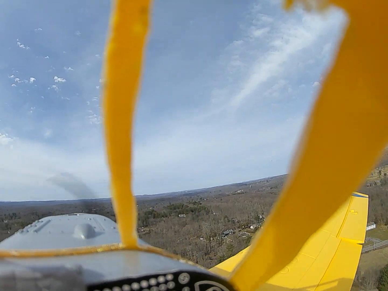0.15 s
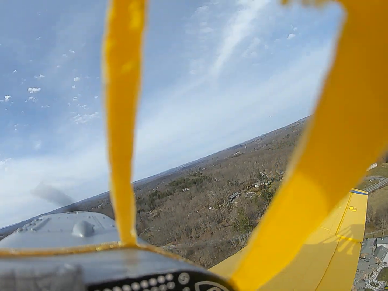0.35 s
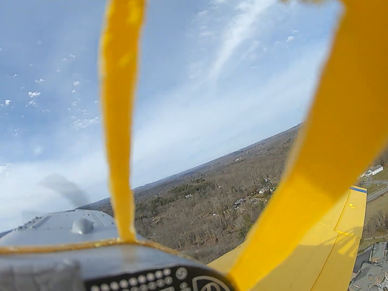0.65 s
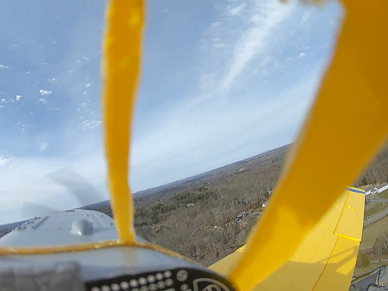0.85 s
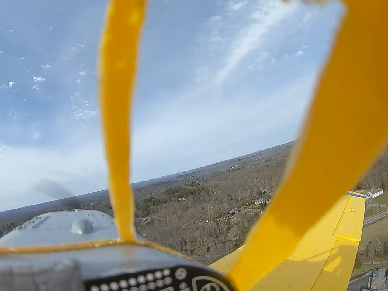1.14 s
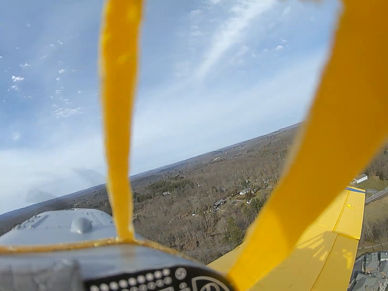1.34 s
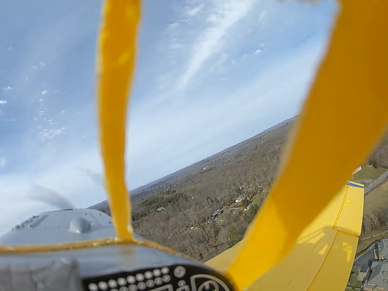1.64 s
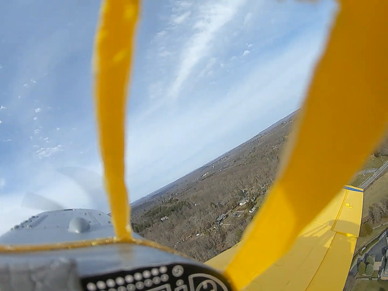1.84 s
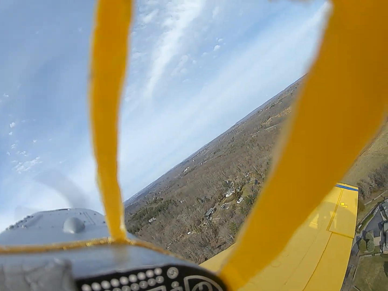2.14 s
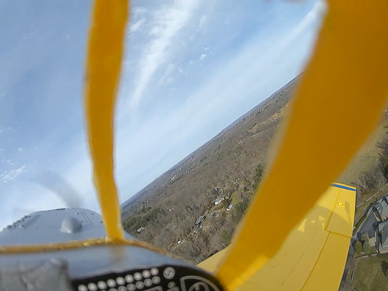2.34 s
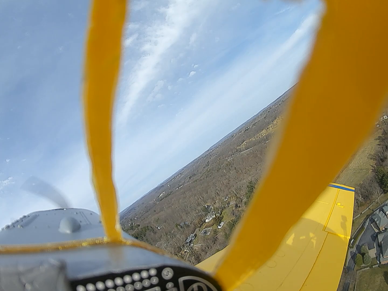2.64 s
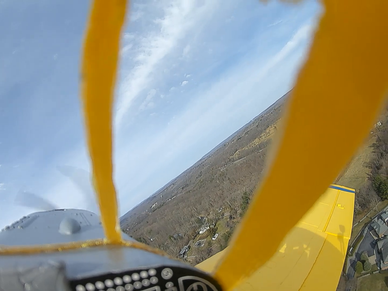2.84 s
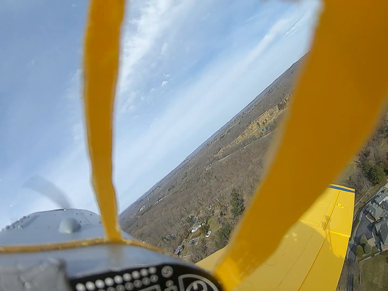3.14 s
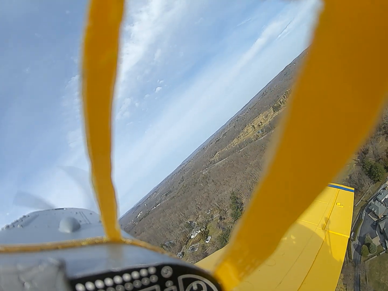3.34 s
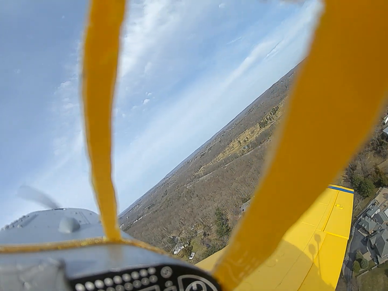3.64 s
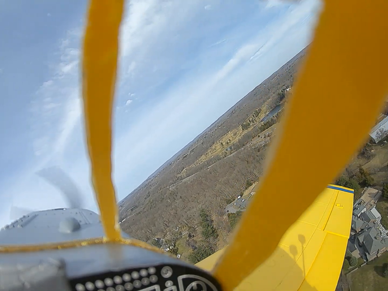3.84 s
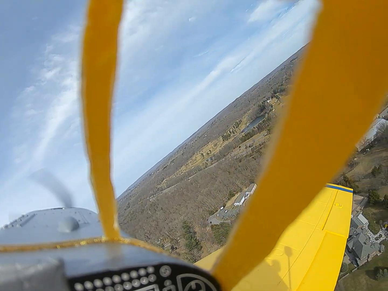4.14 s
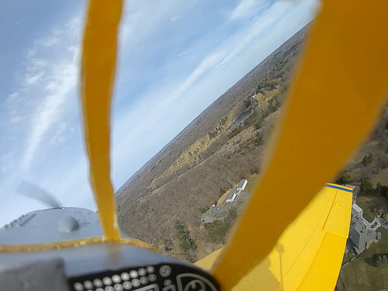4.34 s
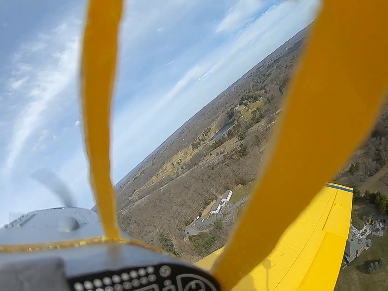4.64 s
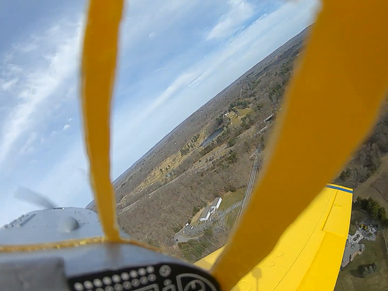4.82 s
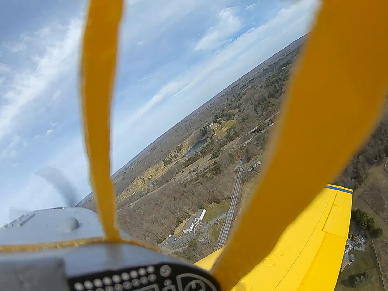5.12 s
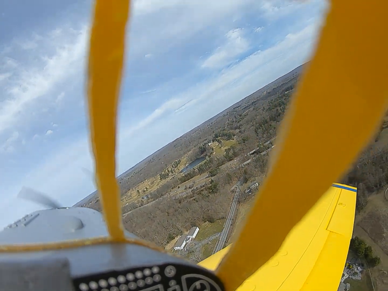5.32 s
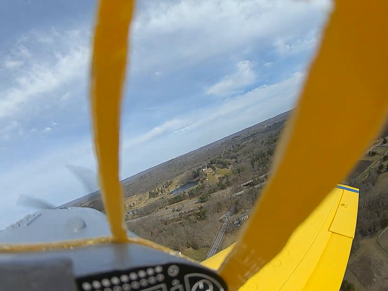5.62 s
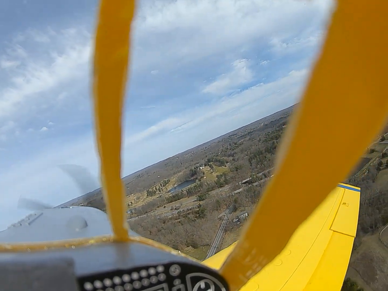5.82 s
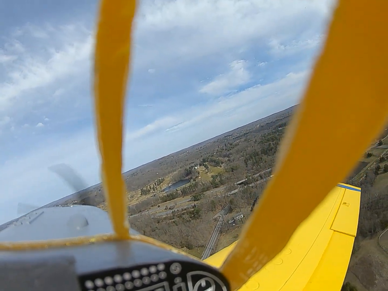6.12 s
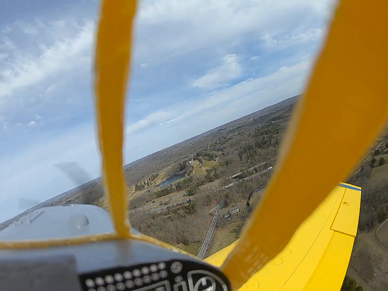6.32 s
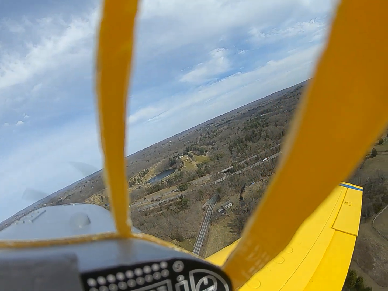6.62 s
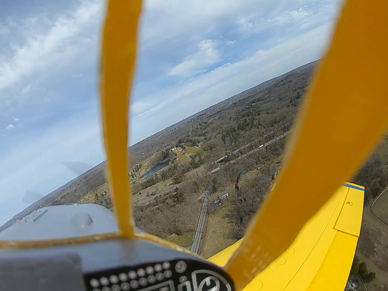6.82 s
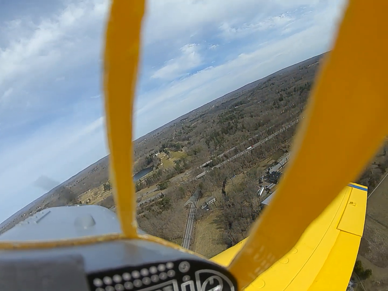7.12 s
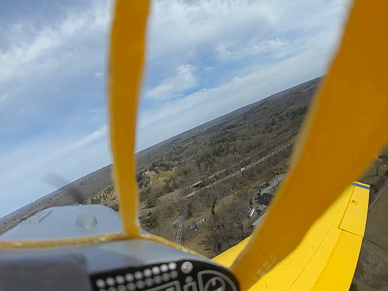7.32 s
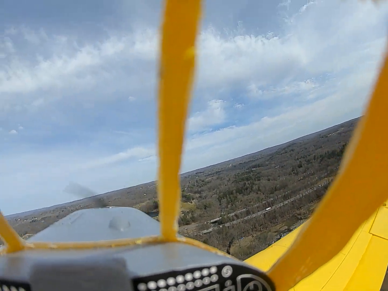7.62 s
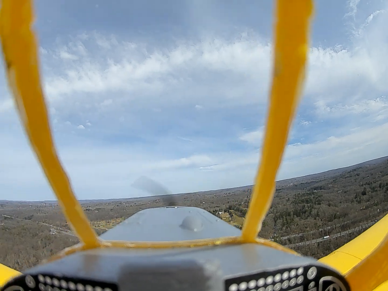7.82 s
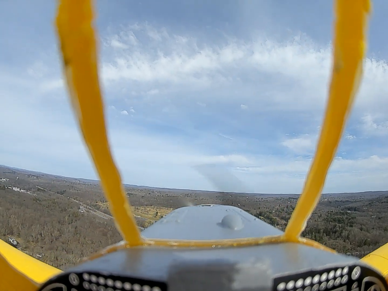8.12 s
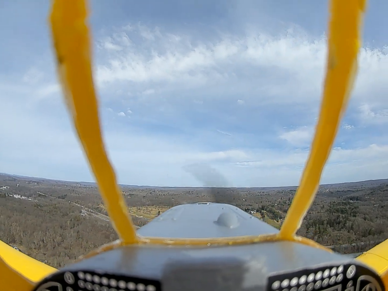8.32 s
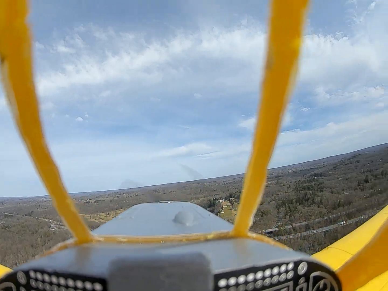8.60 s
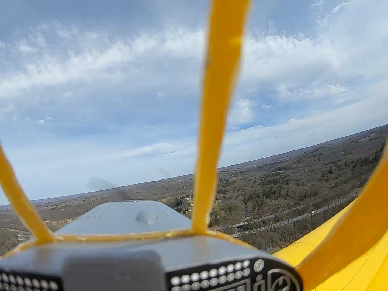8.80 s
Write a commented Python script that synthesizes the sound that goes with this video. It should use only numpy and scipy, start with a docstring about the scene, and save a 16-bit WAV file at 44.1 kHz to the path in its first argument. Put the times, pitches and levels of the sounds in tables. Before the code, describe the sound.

Close inside the cockpit of a flying electric model plane, a propeller hum shakes the airframe and makes a loose part buzz. Partway through, the motor slows to a lower, much softer hum with a thin whine and no rattle. Near the end it speeds up quickly, bringing the buzz back and holding a steady pitch. Rushing air and low wind buffeting continue throughout.

```python
"""The propeller hum of a small electric model plane in flight, from a microphone inside the cockpit.
The unbalanced propeller shakes the airframe at the shaft rate; the throttle eases back, then opens again.
At high speed a loose part strikes twice a turn and buzzes; at low speed it rests and the motor's
magnetic whine comes through. Air rushes over the canopy, close around the microphone, throughout."""
import sys
import numpy as np
from scipy import signal
from scipy.fft import rfft, irfft, next_fast_len
from scipy.io import wavfile
from scipy.ndimage import uniform_filter1d, map_coordinates

SR = 44100
rng = np.random.default_rng(int(sys.argv[2]) if len(sys.argv) > 2 else 0)


def generate_wav(signal):
    """Clip the signal to [-1, 1] and save it as 16-bit WAV at the path in sys.argv[1]."""
    frames = np.transpose(np.atleast_2d(signal))
    scaled = np.clip(frames, -1, 1) * 32767
    pcm = np.round(scaled).astype(np.int16)
    wavfile.write(sys.argv[1], SR, pcm)


N = 395130
CRUISE_HZ, CRUISE_SHAKE_DB = 165, -21.5

# The throttle through the flight. Each row: time in seconds, shaft speed in Hz.
THROTTLE = [(0.4, 182.3), (2.0, 180.5), (2.4, 174.6), (2.95, 170.7), (3.36, 157.2), (3.65, 147.7),
            (4.02, 140.1), (4.49, 139.0), (4.83, 137.0), (5.83, 137.5), (6.36, 141.4), (6.64, 143.3),
            (6.81, 155.3), (7.15, 165.2), (7.34, 167.0), (7.95, 165.0), (8.96, 164.8)]
# How hard the imbalance shakes the cockpit. Each row: shaft speed in Hz, level in dB.
IMBALANCE = [(137, -39.5), (144, -35.5), (154, -28), (161, -22), (175.5, -21), (179.5, -25.5), (182, -25.5)]
def propeller():
    """Speed, turns made and shaking; turbulence loads the blades unevenly, more so at speed."""
    speed = timeline(THROTTLE)
    drift = 0.0009 * (speed / CRUISE_HZ) ** 5 * wobble(9)
    flutter = 0.0005 * wobble(50)
    turns = np.cumsum(speed * (1 + drift + flutter)) / SR
    return speed, turns, along(IMBALANCE, speed)


# The motor's effort. Each row: shaft acceleration in Hz per second, gain in dB.
EFFORT = [(-38, -3.5), (-0.5, 0), (-1, 0), (7, 2)]
def motor_load(speed):
    """Gain in dB: the motor pulls harder while it speeds up and coasts while it slows."""
    acceleration = uniform_filter1d(np.gradient(speed) * SR, size=SR // 5)
    return np.interp(acceleration, *np.transpose(EFFORT))


# Airframe panels around the microphone. Each row: resonance in Hz, width in Hz, peak gain in dB.
PANEL_MODES = [(364.4, 10.5, -36.5), (390, 11, -57), (497, 20, -42.5), (537, 12, -54.5), (672, 32, -49)]
def panels(hz):
    """Gain of the panels, which resonate as a tone sweeps through them."""
    powers = (amp(db) ** 2 / (1 + (2 * (hz - centre) / width) ** 2) for centre, width, db in PANEL_MODES)
    return np.sqrt(sum(powers))


# One overtone swells. Each row: shaft order, middle in seconds, length in seconds, boost in dB.
HUM_SWELLS = [(3, 5.13, 1.9, 11), (2, 8.44, 1.7, 6)]
# The hum's weak top. Each row: shaft order, level in dB against the slipstream level.
UPPER_ORDERS = [(5, -17), (6, -18.5), (7, -20), (8, -22), (9, -20.5), (10, -23.5), (13, -28)]
def hum(turns, speed, shake_db, load_db, rush_db):
    """Imbalance and blade passes shake the airframe; gusts make the tones waver."""
    out = (amp(shake_db) + amp(-55.5) * wobble(24)) * tone(turns, 1)
    for order in (2, 3, 4):
        swell_db = sum(db * bump(s, length) for which, s, length, db in HUM_SWELLS if which == order)
        drive = (speed / CRUISE_HZ) ** 2 * amp(load_db + swell_db + 1.28 * wobble(15))
        out += drive * panels(order * speed) * tone(turns, order)
    for order, db in UPPER_ORDERS:
        out += amp(rush_db + load_db + db + 2.3 * wobble(8)) * tone(turns + rng.random(), order)
    return out


# The buzz falters. Each row: middle in seconds, length in seconds, depth in dB.
FLOATS = [(.27, .025, 6), (0.308, 0.045, 5), (0.437, .03, 7), (0.489, 0.12, 6.5), (.845, 0.025, 5),
          (0.964, 0.048, 12), (1.203, 0.91, 3), (1.23, 0.042, 14), (1.29, 0.062, 22), (1.507, .06, 5),
          (3.417, .2, 1.5), (8.4, 2.3, 1.5)]
def strike_force(shake_db, lift_off_db=-29.5):
    """The loose part rests until shaken hard enough; gusts press it harder or let it float."""
    excess = np.sqrt(np.maximum(amp(shake_db) ** 2 - amp(lift_off_db) ** 2, 0))
    dip_db = sum(depth_db * bump(s, length) for s, length, depth_db in FLOATS)
    gust_db = 0.47 * wobble(65) + 0.2 * wobble(7)
    return excess ** 0.76 * amp(gust_db - dip_db)


# The loose part's ring, heard close. Each row: frequency in Hz, relative level in dB.
PART_RING = [(1200, -27), (2350, -8), (2650, -2.5), (2950, -8.5), (3300, 2), (3600, -2.5), (3900, 4),
             (4200, -2.5), (4500, 0), (5200, -2), (6200, 9), (6900, -0.5), (7900, -4.5), (8700, -10.5),
             (10000, -9.5), (13300, -21.5)]
# The scrape of its return strike. Each row: frequency in Hz, relative level in dB.
PART_SCRAPE = [(2000, -9), (3500, 1.5), (4600, -2.5), (5900, -2), (7200, -3), (8600, -7.5), (10000, -3),
               (11000, -5.5), (11900, -9.5), (13000, -5), (13900, -8), (14800, -3), (15600, -5),
               (16000, -11.5)]
def rattle(turns, speed, shake_db):
    """A loose part ticks on its stop once a turn, chafes, then scrapes the opposite stop."""
    force = strike_force(shake_db)
    swing = turns + 0.0052 * wobble(25)  # the moment of contact wanders
    blows = strikes(swing, angle=0.5, jitter_s=1.6e-5, scatter_db=0.6)
    scuffs = scuff(blows, life_s=0.0015)
    tick = ring(blows, PART_RING)
    chafe = amp(-1.5) * ring(scuffs, PART_RING) + amp(-7) * ring(scuffs, PART_SCRAPE)
    chafe_db = -17 + 0.7 * (speed - CRUISE_HZ)
    rebounds = strikes(swing, angle=0.16, jitter_s=0.00014, scatter_db=-1.0)
    scrape = ring(scuff(rebounds, life_s=0.0006), PART_SCRAPE) + amp(-10) * noise(PART_SCRAPE)
    scrape_db = -7 + 2.3 * (shake_db - CRUISE_SHAKE_DB)
    return amp(-28) * force * (tick + amp(chafe_db) * chafe + amp(scrape_db) * scrape)


def strikes(turns, angle, jitter_s, scatter_db, size=8):
    """One impulse each time the shaft passes an angle (in turns), uneven in time and strength."""
    passes = np.arange(1, int(turns[-1]) - 1) + angle
    late, strong = rng.standard_normal((len(passes), 2)).T
    at = np.interp(passes, turns, np.arange(N)) + jitter_s * SR * late
    taps = at.astype(int)[:, None] + np.arange(1 - size, size + 1)
    offset = taps - at[:, None]
    shape = np.sinc(offset) * np.cos(np.pi * offset / (2 * size)) ** 2  # lands between samples
    pulses = shape * amp(scatter_db * strong)[:, None]
    return np.bincount(np.clip(taps, 0, N - 1).ravel(), pulses.ravel(), N)


def scuff(blows, life_s):
    """Each blow drags on as a short burst of noise."""
    return signal.lfilter([1], [1, -np.exp(-1 / (life_s * SR))], blows) * rng.standard_normal(N)


def ring(x, spectrum, size=1024):
    """x through a body that rings only after it is struck (minimum phase), at rms 1."""
    cepstrum = irfft(np.log(amp(along(spectrum, np.fft.rfftfreq(size, 1 / SR)))))
    cepstrum[1:size // 2] *= 2
    cepstrum[size // 2 + 1:] = 0
    response = irfft(np.exp(rfft(cepstrum)))
    return unit(signal.oaconvolve(x, response)[:N])


def slipstream(speed, cruise_db=-42, db_per_octave=20.5, lag_s=0.21):
    """Slipstream level in dB: airspeed takes a moment to follow the propeller."""
    target_db = cruise_db + db_per_octave * np.log2(speed / CRUISE_HZ)
    keep = np.exp(-1 / (lag_s * SR))
    return target_db[0] + signal.lfilter([1 - keep], [1, -keep], target_db - target_db[0])


# Turbulence along the way. Each row: time in seconds, relative level of the buffeting in dB.
ROUGH_AIR = [(0, -48), (1.6, -48), (2.05, -44.5), (4.5, -49), (6.4, -51.5), (7.3, -50), (8.96, -54)]
# Three colours of wind, heard from under the canopy. Each row: frequency in Hz, relative level in dB.
FUSELAGE_BUFFET = [(20, -29), (35, -15), (65, 0), (120, 2), (200, -1), (300, -8), (470, -6), (650, -17.5),
                   (1200, -32), (3000, -68)]
CANOPY_RUSH = [(100, 3.5), (230, 5), (450, 1.5), (650, -2.5), (950, -2), (1150, 0.5), (1400, 2.5),
               (1700, -2.5), (2100, -9.5), (2600, -19), (3000, -21), (6000, -40.5)]
GAP_HISS = [(1500, -16), (3000, -7), (3900, 5), (4200, 3), (5200, 3), (6200, 4.5), (7300, -3), (7900, -1),
            (8600, -9), (9600, -4.5), (11000, -21), (12500, -21), (13400, -13), (15500, -24)]
def airflow(rush_db):
    """Eddies thump the fuselage while the slipstream rushes over the canopy and hisses in its gaps."""
    buffet = amp(timeline(ROUGH_AIR) + 6.0 + 0.55 * wobble(13)) * noise(FUSELAGE_BUFFET)
    rush = amp(rush_db + 2.0 + 0.52 * wobble(24)) * noise(CANOPY_RUSH)
    hiss = amp(rush_db - 22.3) * noise(GAP_HISS)
    return buffet + rush + hiss


# The motor bell's resonance, where the main whine swells. Each row: frequency in Hz, level in dB.
MOTOR_BELL = [(5500, -60), (5760, -58.5), (5860, -62.5), (6000, -65.5), (6300, -68), (7000, -98)]
# Orders in sevens from 14 magnets, and sidebands. Each row: shaft order, level in dB before motor load.
MAGNET_ORDERS = [(21, -84.5), (28, -81), (35, -78.5), (36, -83), (41, -79.5), (43, -76.5), (44, -76.5),
                 (46, -85), (57, -90)]
def whine(turns, load_db, main_order=42, switching_hz=11698):
    """Magnets sweep past the stator teeth; the speed controller adds a faint, steady switching tone."""
    main_hz = main_order * np.gradient(turns) * SR
    main = amp(along(MOTOR_BELL, main_hz) + 0.48 * wobble(8.7)) * tone(turns, main_order)
    magnets = sum(amp(db + load_db + 2 * wobble(15)) * tone(turns + rng.random(), order)
                  for order, db in MAGNET_ORDERS)
    switching = amp(-87) * tone(np.arange(N) / SR, switching_hz)
    return main + magnets + switching


def amp(db):
    """Decibels to gain."""
    return 10 ** (np.asarray(db) / 20)


def unit(x):
    """x at rms 1."""
    return x / np.sqrt(np.mean(x ** 2) + 1e-20)


def along(points, hz):
    """(Hz, value) points read on a log axis."""
    freqs, values = np.transpose(points)
    return np.interp(np.log(hz + 1), np.log(freqs + 1), values)


def timeline(points):
    """(seconds, value) points read at every sample."""
    return np.interp(np.arange(N) / SR, *np.transpose(points))


def bump(middle_s, length_s):
    """A smooth rise from 0 to 1 and back."""
    return np.cos(np.pi * np.clip((np.arange(N) / SR - middle_s) / length_s, -0.5, 0.5)) ** 2


def wobble(rate):
    """A smooth random curve of rms 1, rate knots a second."""
    knots = rng.standard_normal(int(N * rate / SR) + 4)
    return unit(map_coordinates(knots, [np.arange(N) * rate / SR]))


def tone(turns, order):
    """A sine of rms 1, order cycles to the turn."""
    return np.sqrt(2) * np.sin(2 * np.pi * order * turns)


def filtered(x, response):
    """x shaped by a gain that depends on frequency."""
    size = next_fast_len(N + SR // 4)
    return irfft(rfft(x, size) * response(np.fft.rfftfreq(size, 1 / SR)), size)[:N]


def noise(spectrum):
    """Coloured noise of rms 1."""
    return unit(filtered(rng.standard_normal(N), lambda hz: amp(along(spectrum, hz))))


def scene():
    """Inside the cockpit: one shaft speed drives hum, whine, rattle and slipstream."""
    speed, turns, shake_db = propeller()
    load_db, rush_db = motor_load(speed), slipstream(speed)
    motor = hum(turns, speed, shake_db, load_db, rush_db) + whine(turns, load_db)
    return (motor + rattle(turns, speed, shake_db) + airflow(rush_db))[None]


def record(dry):
    """One on-board microphone, mono, keeping nothing above its band limit."""
    top_hz = 15900
    return filtered(dry[0], lambda hz: hz < top_hz)[None]


dry = scene()
out = record(dry)
generate_wav(out)
```